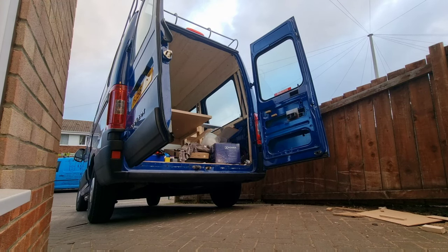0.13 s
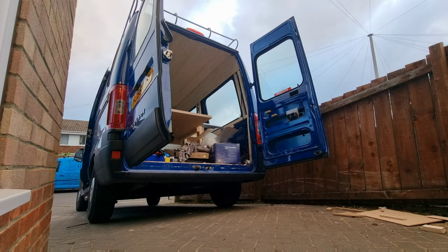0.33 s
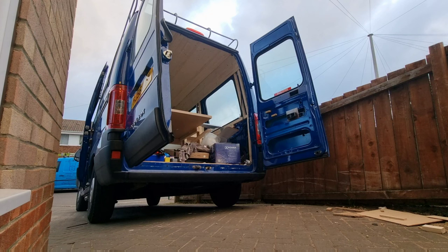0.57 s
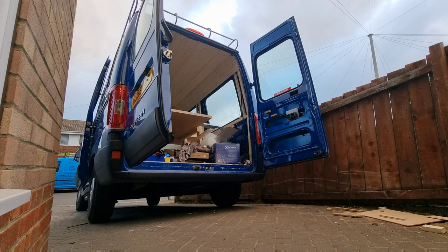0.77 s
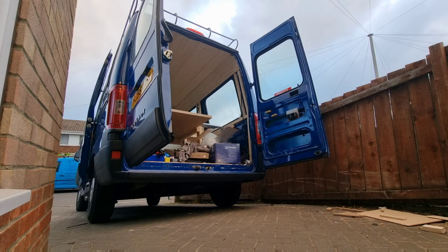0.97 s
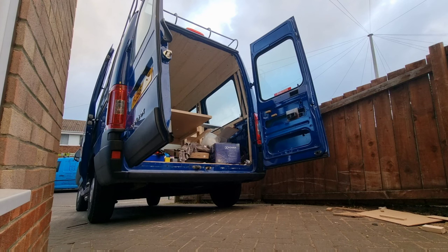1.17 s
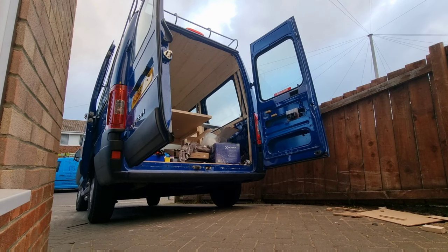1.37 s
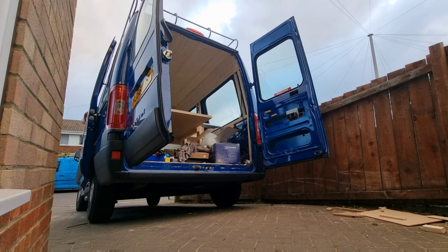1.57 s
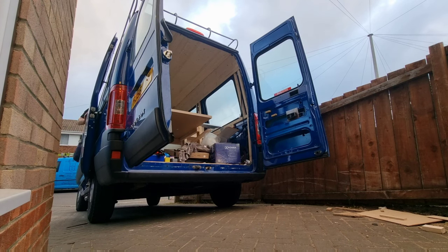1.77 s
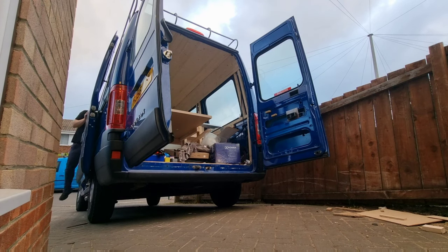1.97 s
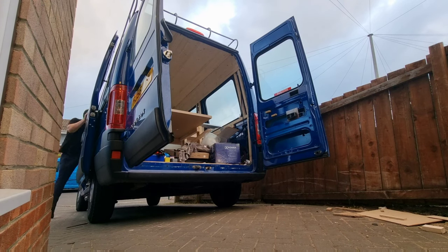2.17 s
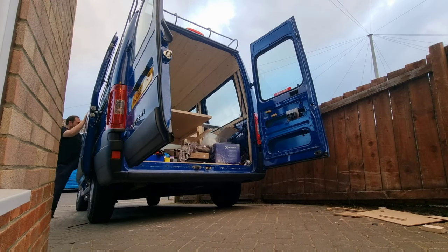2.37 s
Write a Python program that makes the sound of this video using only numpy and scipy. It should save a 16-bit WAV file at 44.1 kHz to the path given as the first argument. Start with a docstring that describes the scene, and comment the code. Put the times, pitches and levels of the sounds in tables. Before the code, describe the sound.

A van's sliding side door pops open and rolls back with a hollow rumble, brief squeaks and a sharp metal clack. It slows to rest, then shoes scuff faintly on paving. Heard outdoors from behind the van.

```python
"""Van side door sliding open.

Heard from behind the van, beside a brick wall. The door pops out of its seal and rolls back.
Rollers rumble through the door panel and hollow load space, squeak, groan and clack on the track.
The door slows to rest; shoes scuff the paving. The gap between van and wall smears the sound."""
import sys
import numpy as np
from scipy import signal
from scipy.fft import rfft, irfft
from scipy.io import wavfile
from scipy.ndimage import uniform_filter1d

SR = 44100
rng = np.random.default_rng(int(sys.argv[2]) if len(sys.argv) > 2 else 0)


def wrap_up_sound(samples):
    """Save the sound to the file named by the first command line argument, as 16-bit audio."""
    columns = np.atleast_2d(samples).T
    # keep every value between -1 and 1, then stretch to whole-number steps
    tamed = np.clip(columns, -1, 1)
    steps = np.round(tamed * 32767).astype(np.int16)
    wavfile.write(sys.argv[1], SR, steps)


N = 110250

# Rolling effort. Each row: time in seconds, level in dB.
ROLL_EFFORT = [(0.08, -65.5), (0.19, -42.5), (0.27, -32.5), (0.42, -39.5), (0.55, -39), (0.66, -29),
               (0.76, -29.5), (0.88, -31.5), (1.37, -32), (1.53, -34), (1.68, -32.5), (1.81, -38),
               (1.9, -43), (2.03, -50), (2.15, -66), (2.5, -59.5)]
# Roller speed. Each row: time in seconds, share of top speed.
ROLL_SPEED = [(0.1, 0.7), (0.7, 0.8), (0.9, 1), (1.15, 0.99), (1.4, .85), (1.65, 0.4), (2.1, 0.22)]
# Door panel and load space modes. Each row: frequency in Hz, relative level in dB, T60 in seconds.
PANEL_MODES = [(176.2, -3, 0.4), (194.4, -2.5, 0.32), (216.7, 5.5, 0.24), (250.8, 3, 0.14),
               (286.2, -4, 0.29), (342.3, 2, 0.21), (388.5, 0, 0.12), (455, -7, 0.12), (499.6, -13.5, 0.55),
               (550, -7.5, 0.15)]
LOAD_SPACE_MODES = [(56.2, 2, 0.071), (68.84, -4, 0.8), (81.3, 3, 0.053)]
# Hiss and clack spectra. Each row: frequency in Hz, relative level in dB.
HISS_SPECTRUM = [(300, -36), (1000, 12.5), (1800, 5.5), (3000, 1.5), (4500, -6), (7000, -10), (8300, -25.5),
                 (14000, -26), (16000, -44.5)]
CLACK_SPECTRUM = [(300, -0.5), (1000, 10), (1500, 2.5), (2300, -2), (3200, -2), (5000, -5.5), (7200, -7.5),
                  (8200, -22), (15000, -50.5)]
TOP_HZ = 15450


def undb(db):
    """Decibels to gain."""
    return 10 ** (np.asarray(db) / 20)


def unit(x):
    """Scale to rms 1."""
    return x / np.sqrt(np.mean(x ** 2))


def clock():
    """Sample times in seconds."""
    return np.arange(N) / SR


def curve(rows):
    """Join (seconds, value) rows by straight lines."""
    return np.interp(clock(), *np.array(rows).T)


def noise():
    """White noise."""
    return rng.standard_normal(N)


def colour(x, spectrum, size=8192):
    """Minimum-phase filter of (Hz, dB) shape; keeps the power of white noise."""
    hz, db = np.array(spectrum).T
    bins_hz = np.maximum(np.arange(size // 2 + 1) * SR / size, 1)
    gain = undb(np.interp(np.log(bins_hz), np.log(hz), db))
    cepstrum = irfft(np.log(gain))
    cepstrum[1:size // 2] *= 2
    cepstrum[size // 2 + 1:] = 0
    response = irfft(np.exp(rfft(cepstrum)))
    return play(x, response / np.linalg.norm(response))


def play(x, response):
    """Convolve with an impulse response."""
    return signal.fftconvolve(x, response)[:N]


def ring(modes, t60_scale=1):
    """Unit-energy impulse response of (Hz, dB, T60 in seconds) modes."""
    t = clock()[:SR]
    response = sum(undb(db - 60 * t / (t60_s * t60_scale)) * np.sin(2 * np.pi * hz * t)
                   for hz, db, t60_s in modes)
    return response / np.linalg.norm(response)


def below(x, hz):
    """Gentle zero-phase low-pass."""
    return signal.sosfiltfilt(signal.butter(2, hz, fs=SR, output="sos"), x, padtype=None)


def burst(start_s, rise_s, decay_s):
    """Contact envelope: swells, then dies away."""
    age_s = np.maximum(clock() - start_s, 0)
    return (1 - np.exp(-age_s / rise_s)) ** 2 * np.exp(-age_s / decay_s)


def outdoor_air(level_db=-53.5):
    """Quiet, steady outdoor noise, mostly bass."""
    # Each row: frequency in Hz, relative level in dB.
    spectrum = [(25, -2), (60, -15.5), (105, -8), (150, -26.5), (1100, -29), (3000, -43), (7000, -54),
                (15000, -78)]
    return undb(level_db) * unit(colour(noise(), spectrum))


def grit(decay_s=0.0023):
    """Grit cracks under a shoe."""
    # Each row: start in seconds, level in dB.
    grains = [(2.426, -54), (2.437, -58)]
    force = sum(noise() * burst(start_s, decay_s / 10, decay_s) * undb(db) for start_s, db in grains)
    return colour(force, CLACK_SPECTRUM)


def scuffs(rise_s=0.0039, thud_hz=237, thud_t60_s=0.059):
    """Shoes scrape the paving, each with a dull thud."""
    # Each row: start in seconds, level in dB, decay in seconds, relative thud level in dB.
    scrapes = [(2.286, -42.5, 0.02, -20), (2.376, -48.5, 0.028, -2.5), (2.408, -51, 0.053, 5),
               (2.475, -53, 0.058, 3.5)]
    # Each row: frequency in Hz, relative level in dB.
    spectrum = [(150, -18), (350, 14), (1000, 10), (1500, -5), (2300, -6), (3500, -11), (7000, -19),
                (8500, -47)]
    thud = ring([(thud_hz, 0, thud_t60_s)])
    out = 0
    for start_s, db, decay_s, thud_db in scrapes:
        rub = noise() * burst(start_s, rise_s, decay_s) * undb(db)
        out += colour(rub, spectrum) + undb(thud_db) * play(rub, thud)
    return out


def boom():
    """The hollow load space drones as the door moves."""
    # Each row: time in seconds, level in dB.
    levels = [(0.1, -57.5), (0.3, -34), (0.45, -37), (0.58, -38), (0.75, -25.5), (0.92, -41.5), (1.22, -32),
              (1.33, -56), (1.45, -37.5), (1.65, -40.5), (1.9, -46.5), (2.2, -55.5), (2.5, -75)]
    drone = play(noise(), ring(LOAD_SPACE_MODES))
    running_rms = np.sqrt(uniform_filter1d(drone ** 2, size=SR // 6) + 1e-9)
    return drone / running_rms * undb(curve(levels))


def thumps():
    """Soft blows on the door ring the panel and load space."""
    # Each row: start and push length in seconds, panel peak and load space peak in dB.
    blows = [(0.217, 0.0023, -9, -21), (0.256, 0.0013, -28, -12.5), (0.338, 0.0068, -52, -18.5),
             (1.138, 0.0022, -14.5, -39), (1.379, 0.00087, -26, -42), (1.644, 0.0023, -24, -35),
             (1.778, 0.0031, -25.5, -40.5)]
    out = 0
    for start_s, push_s, panel_db, space_db in blows:
        force = np.sin(np.pi * np.clip((clock() - start_s) / push_s, 0, 1))
        for modes, db in ((PANEL_MODES, panel_db), (LOAD_SPACE_MODES, space_db)):
            thump = play(force, ring(modes, t60_scale=0.9))
            out += undb(db) * thump / np.abs(thump).max()
    return out


def catch():
    """The steel catch is struck twice and rings briefly."""
    # Each row: time in seconds, peak in dB.
    hits = [(1.12, -12.5), (1.128, -11)]
    # Each row: frequency in Hz, relative level in dB, T60 in seconds.
    steel_modes = [(1310, -9, 0.19), (2450, -10, 0.046), (2572, 7.5, 0.045), (2697, 0.5, 0.18),
                   (3810, 2.5, 0.037), (3950, -8, 0.052)]
    force = np.zeros(N)
    for start_s, db in hits:
        force[int(start_s * SR)] = undb(db)
    response = ring(steel_modes)
    return play(force, response / np.abs(response).max())


def squeals(jitter_share=0.035, jitter_hz=700, rasp_db=-18):
    """A roller sticks and slips: short, unsteady tones with a rasp at each slip."""
    # Each row: start and length in seconds, pitch in Hz, sag as a share of pitch,
    # level in dB, step per overtone in dB.
    rubs = [(0.278, 0.035, 6740, 0.044, -44.5, -15), (0.974, 0.028, 875, -0.03, -28.5, -9.5),
            (1.029, 0.023, 890.6, -.02, -19, -12.5), (1.06, 0.021, 840.6, 0.043, -27, -16.5)]
    out = 0
    for start_s, length_s, hz, sag, db, step_db in rubs:
        progress = np.clip((clock() - start_s) / length_s, 0, 1)
        jitter = jitter_share * unit(below(noise(), jitter_hz))
        pitch_hz = hz * (1 - sag * (progress - 0.5) + jitter)
        phase = 2 * np.pi * np.cumsum(pitch_hz) / SR
        tone = sum(undb(step_db * k) * np.sin((k + 1) * phase) for k in range(5) if (k + 1) * hz < TOP_HZ)
        rasp = undb(rasp_db) * colour(noise() * (1 + np.cos(phase)), HISS_SPECTRUM)
        out += undb(db) * (unit(tone) + rasp) * np.sin(np.pi * progress)
    return out


def clacks(rise_s=0.003):
    """Rollers chatter on the steel track; its ring pitch depends on where they strike."""
    # Each row: start in seconds, relative force in dB, contact decay in seconds,
    # sizzle trim and knock gain in dB, ring pitch in Hz, ring gain in dB.
    strikes = [(0.215, -48, 0.017, -13, 14, 900, 0.5), (0.358, -59.5, 0.00082, -3, -14, 1910, 6),
               (0.451, -55, 0.02, -7, 7, 2950, 0), (0.715, -42, 0.003, -4.5, -1, 2100, -10),
               (1.1, -43.5, 0.014, 2, -13, 3000, -22), (1.122, -29.5, 0.0078, 4, -2.5, 670, -8),
               (1.178, -50.5, 0.008, -11, -5, 1830, 5.5), (1.28, -44, 0.0035, -3.5, -5, 1960, 3),
               (1.378, -45.5, 0.005, -7, 2.5, 2300, 3), (1.423, -55, 0.0054, -10, 12.5, 405.2, 8),
               (1.553, -47, 0.009, -10.5, -8, 1930, -5.5), (1.634, -41.5, 0.0066, -5.5, 2.5, 1880, 1)]
    # Each row: frequency in Hz, relative level in dB.
    sizzle_spectrum = [(5000, -36.5), (8200, -6.5), (9500, -1.5), (14500, 1.5), (16000, 1)]
    knock_spectrum = [(120, -32), (350, 10.5), (600, 1), (1000, -4.5), (1500, -19.5), (4000, -41)]
    # Roller-damped track. Each row: multiple of ring pitch, relative level in dB, T60 in seconds.
    track_modes = [(0.661, -6.5, 0.0076), (1, 3.5, 0.0091), (1.17, -6.5, .008)]
    out = 0
    for start_s, db, decay_s, sizzle_db, knock_db, ring_hz, ring_db in strikes:
        force = unit(noise() * burst(start_s, rise_s, decay_s)) * undb(db - 14.5)
        sizzle = undb(sizzle_db - 17) * colour(force, sizzle_spectrum)
        knock = undb(knock_db) * colour(force, knock_spectrum)
        modes = [(ring_hz * ratio, mode_db, t60_s) for ratio, mode_db, t60_s in track_modes]
        track = undb(ring_db) * play(force, ring(modes))
        out += colour(force, CLACK_SPECTRUM) + sizzle + knock + track
    return out


def whirr(top_speed_hz=225.3, waver_t60_s=1 / 18, waver_hz=18, gain_db=-4):
    """Turning rollers give a wavering hum that sinks as the door slows."""
    pitch_hz = top_speed_hz * curve(ROLL_SPEED) ** 0.2
    phase = 2 * np.pi * np.cumsum(pitch_hz) / SR
    waver = ring([(waver_hz, 0, waver_t60_s)])
    hum = play(noise(), waver) * np.cos(phase) + play(noise(), waver) * np.sin(phase)
    return unit(hum) * undb(gain_db + curve(ROLL_EFFORT))


def bumps(rate_per_s=900):
    """Dense, uneven jolts from the track."""
    hits = rng.random(N) < rate_per_s / SR
    return unit(hits * noise())


def rolling(panel_db=-0.5, tilt_hz=357, tilt_db=17.5):
    """Track bumps shake the door panel, brighter with speed, while the rollers hiss."""
    # Each row: frequency in Hz, relative level in dB.
    rumble_spectrum = [(70, -37), (130, -8), (180, -10), (260, 5.5), (305, -5), (350, 0.5), (480, -1.5),
                       (620, -5.5), (850, -7.5), (1100, -20), (1600, -24.5), (3000, -41), (8000, -74.5)]
    # Each row: time in seconds, level in dB.
    hiss_levels = [(0.09, -84.5), (0.14, -55.5), (0.21, -55), (0.24, -41), (0.31, -45), (0.4, -54.5),
                   (0.5, -51), (0.68, -47), (0.94, -48.5), (0.99, -39.5), (1.08, -52), (1.25, -51),
                   (1.52, -60.5), (1.87, -62.5), (1.93, -80), (2.1, -91.5)]
    jolts = bumps()
    rumble = unit(colour(bumps(), rumble_spectrum))
    body = rumble + undb(panel_db) * unit(play(jolts, ring(PANEL_MODES)))
    bass = below(body, tilt_hz)
    treble = (body - bass) * undb(tilt_db * (curve(ROLL_SPEED) - 1))
    hiss = colour(noise() + 0.21 * jolts, HISS_SPECTRUM) * undb(curve(hiss_levels))
    return (bass + treble) * undb(curve(ROLL_EFFORT)) + hiss


def echoes(x, t60_s=0.19, build_s=0.0011, change_s=0.1):
    """Dense reflections between van and wall; random patterns crossfade for the door's travel."""
    hop, age_s = int(change_s * SR), clock()[:SR // 2]
    fade = (1 - np.exp(-age_s / build_s)) * undb(-60 * age_s / t60_s)
    out = np.zeros(N + SR)
    for centre in range(0, N + hop, hop):
        near = np.arange(max(centre - hop, 0), min(centre + hop, N))
        window = np.sqrt(1 - np.abs(near - centre) / hop)
        response = rng.standard_normal(len(age_s)) * fade / np.linalg.norm(fade)
        part = signal.fftconvolve(x[near] * window, response)
        out[near[0]:near[0] + len(part)] += part
    return out[:N]


def passage(body, runner, bass_hz=279, wall_db=-1.5, right_lag_s=0.0003244):
    """Bass bends round the van, left first; the rest mostly bounces, the exposed runner less so."""
    direct_db, runner_direct_db = -9.5, -16.5
    bass_echo_db, runner_echo_db = -11, 1
    t, mix = clock(), body + runner
    bass = below(mix, bass_hz)
    straight = undb(direct_db) * (mix - bass) + undb(runner_direct_db) * runner
    bounced = body + undb(runner_echo_db) * runner - (1 - undb(bass_echo_db)) * bass
    sides = []
    for lag_s, pan_db in ((0, -0.6), (right_lag_s, 0.6)):
        direct = np.interp(t - lag_s, t, bass * undb(pan_db) + straight)
        sides.append(direct + undb(wall_db) * echoes(bounced))
    return np.array(sides)


def scene():
    """Door and shoes between van and wall, over outdoor air; the grit stays dry."""
    body = outdoor_air() + rolling() + whirr() + boom() + thumps() + scuffs()
    runner = clacks() + catch() + squeals()
    return passage(body, runner) + grit()


def record(dry, mic_low_hz=41):
    """The microphone loses the deepest bass; a steep low-pass cuts the top."""
    thin = signal.sosfilt(signal.butter(3, mic_low_hz, "high", fs=SR, output="sos"), dry)
    return signal.sosfilt(signal.ellip(10, 0.2, 80, TOP_HZ, fs=SR, output="sos"), thin)


dry = scene()
out = record(dry)
wrap_up_sound(out)
```